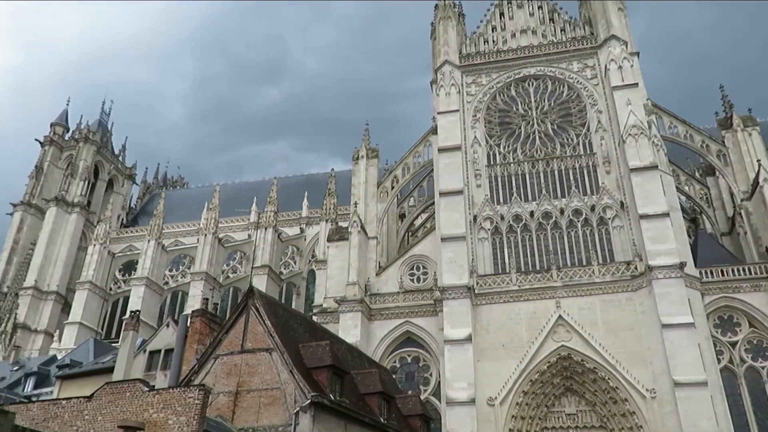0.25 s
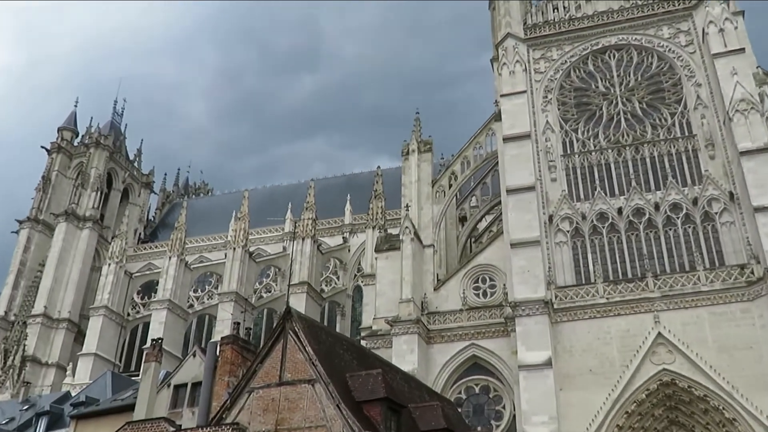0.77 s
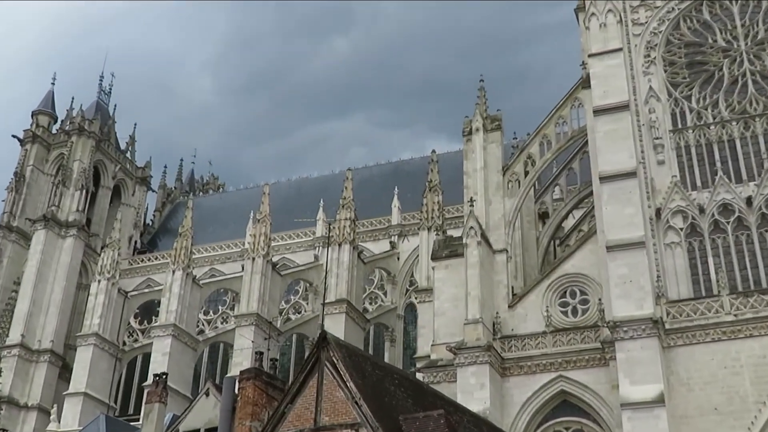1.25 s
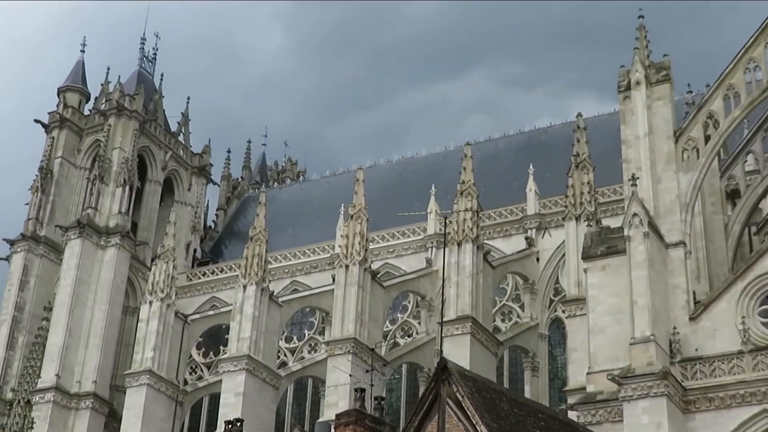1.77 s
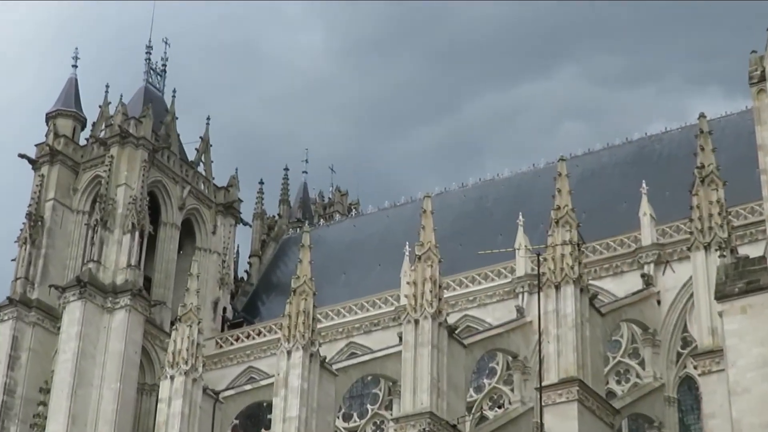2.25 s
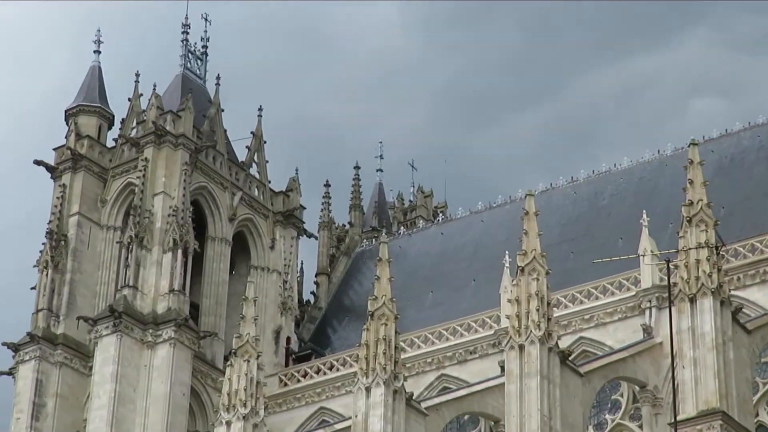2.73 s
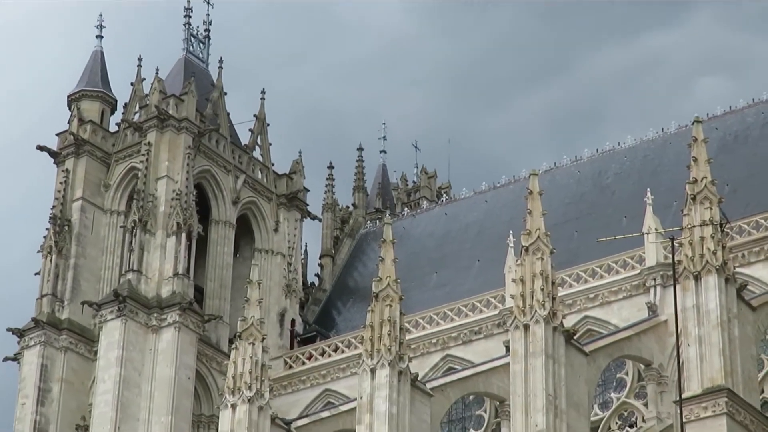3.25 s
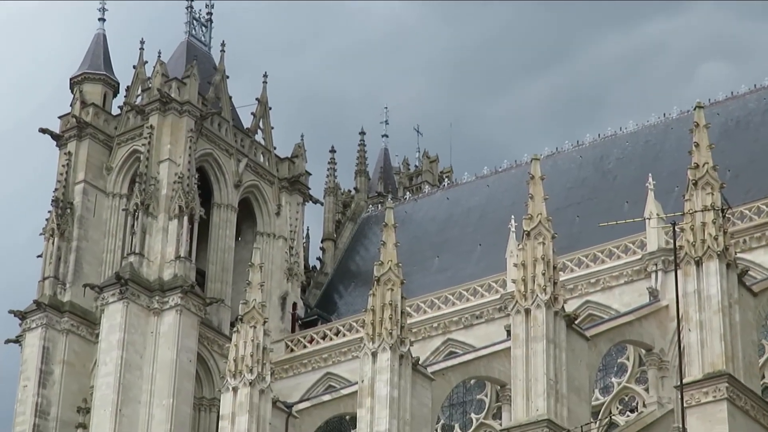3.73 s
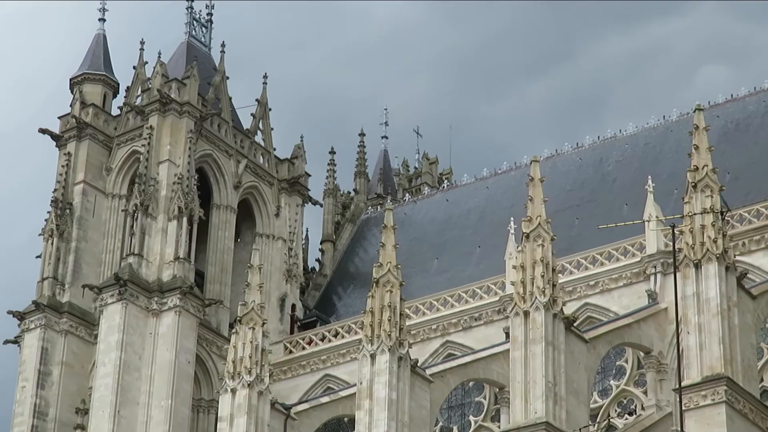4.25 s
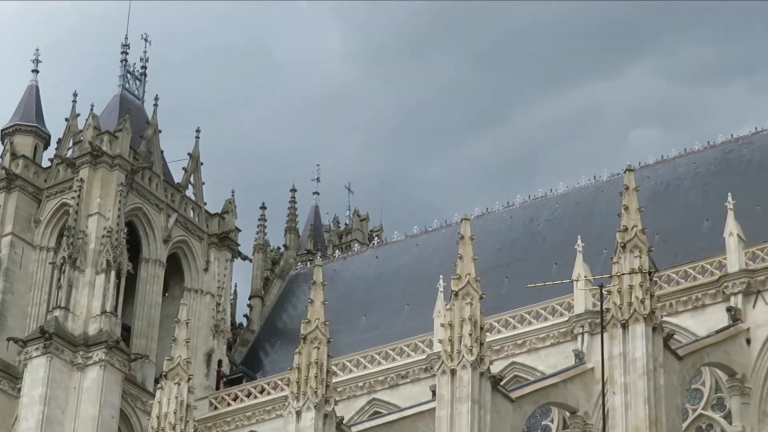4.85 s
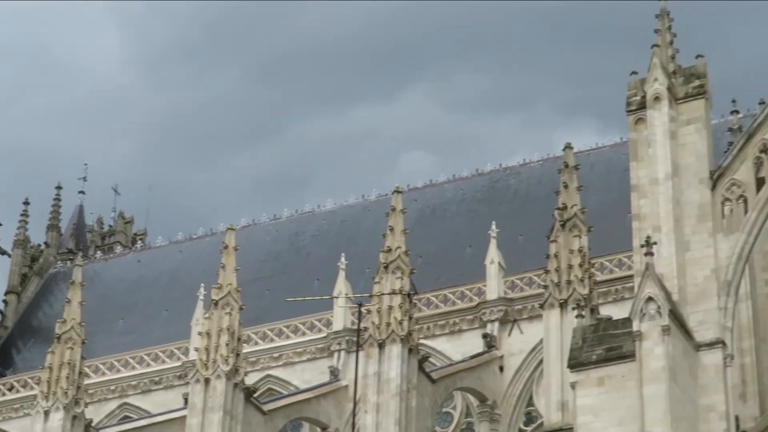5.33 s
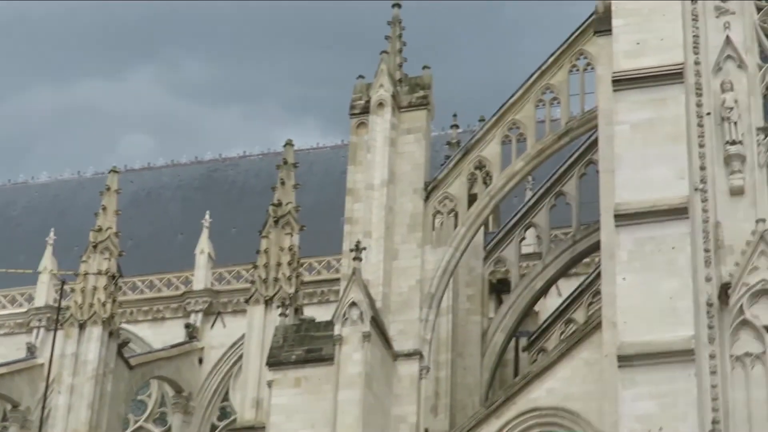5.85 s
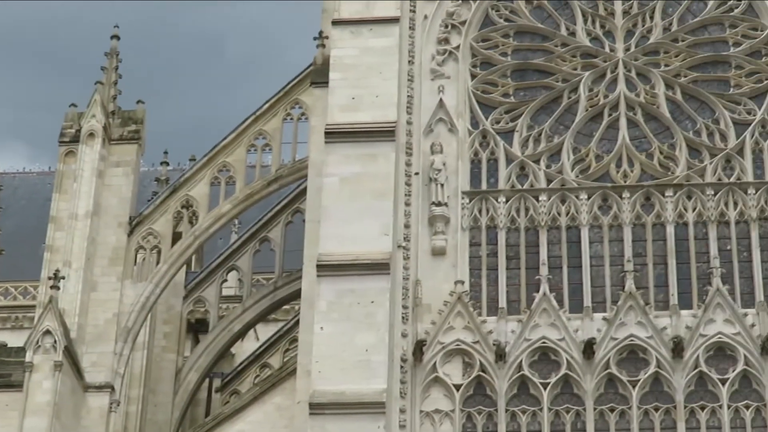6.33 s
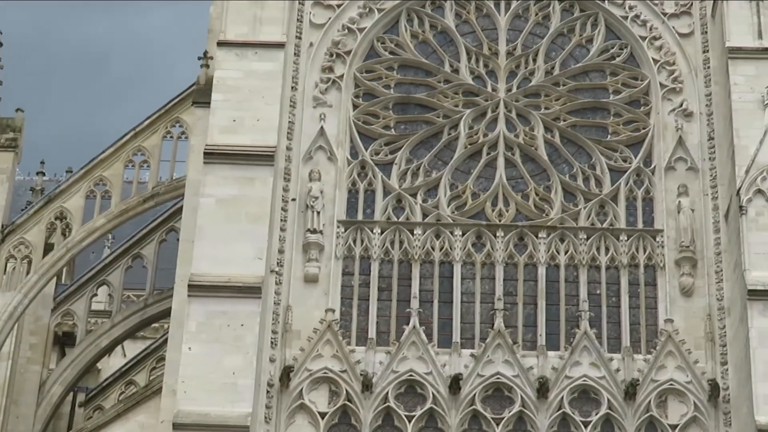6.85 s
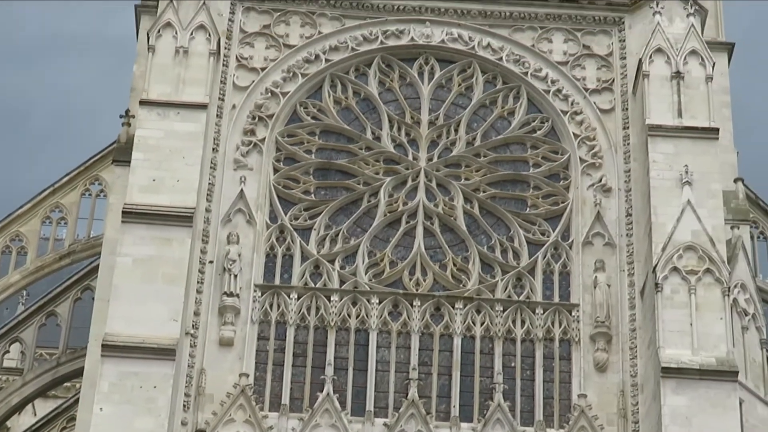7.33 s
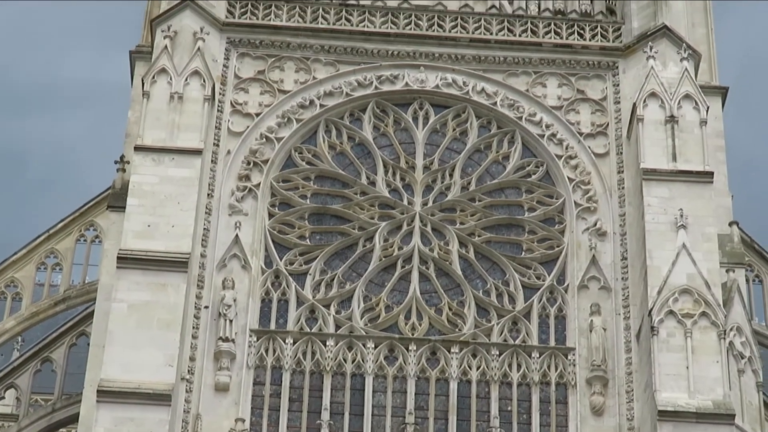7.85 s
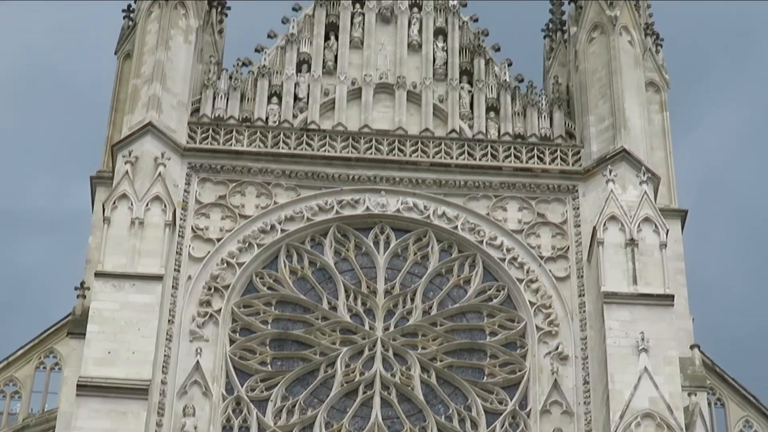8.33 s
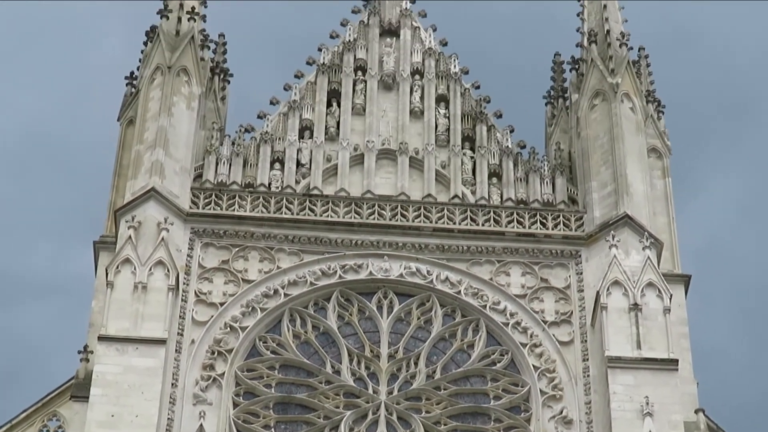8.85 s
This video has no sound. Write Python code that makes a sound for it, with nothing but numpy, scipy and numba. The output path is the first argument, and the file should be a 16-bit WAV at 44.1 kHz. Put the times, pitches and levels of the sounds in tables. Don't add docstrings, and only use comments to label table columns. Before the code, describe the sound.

A handheld stereo microphone catches street traffic beside big stone walls. Deep engine humming swells and sinks in slow pulses, revving and shifting, over dull rumble and airy haze. A cluster of finger ticks, cloth-like scrapes and tiny squeaks comes just past the middle. Soon after, tyres rush loudest, gear teeth whine and another car sweeps by. The engine shifts down in pitch, lingers, then fades among faint other engines.

```python
import sys
import numpy as np
from scipy import signal
from scipy.fft import rfft, irfft, next_fast_len
from scipy.io import wavfile
from scipy.ndimage import uniform_filter1d
from numba import njit

SR = 44100
rng = np.random.default_rng(int(sys.argv[2]) if len(sys.argv) > 2 else 0)


def digitize_waveform(pressure):
    field = np.atleast_2d(pressure).T
    bounded = np.clip(field, -1, 1)
    quanta = np.round(bounded * 32767).astype(np.int16)
    wavfile.write(sys.argv[1], SR, quanta)


def boost_factor(decibels):
    exponent = np.asarray(decibels, float) / 20
    return 10 ** exponent


N = 400869
T = np.arange(N) / SR

# t/s, tyre roar level/dB, brightness/dB
ROLLING = [(0, -44, -2.5), (.35, -46, 1.5), (.8, -44.5, 0), (1.7, -45, -0.5), (2.5, -42.5, 0.5),
           (3.3, -42.5, 0), (3.9, -43, 2), (4.5, -41.5, 3), (5.1, -39.5, 2.5), (5.5, -39, 2),
           (6.15, -34, -1), (6.35, -36, 2.5), (6.55, -32.5, -1), (7.05, -36.5, -.5), (7.6, -38, 1.5),
           (7.9, -35.5, -0.5), (8.4, -41, 2.5), (9.09, -43, -0.5)]


def curve(table, off_db=None):
    s, *columns = np.transpose(table)
    return [np.interp(T, s, c, off_db, off_db) for c in columns]


def unit(x):
    return x / np.sqrt(np.mean(x ** 2))


def walk(rate_hz):
    k = max(int(SR / rate_hz / 64), 2)
    steps = np.repeat(rng.standard_normal(N // 64 // k + 2), k)
    slewed = uniform_filter1d(uniform_filter1d(steps, k), k)
    return 1.3 * np.interp(T, np.arange(len(steps)) * 64 / SR, slewed)


def swell(start_s, length_s):
    gone = np.clip((T - start_s) / length_s, 0, 1)
    return gone, np.sin(np.pi * gone)


def tone(hz, db, wobble=.004, rate_hz=12):
    cycles = np.cumsum(hz * (1 + wobble * walk(rate_hz))) / SR
    return np.sqrt(2) * boost_factor(db) * np.sin(2 * np.pi * (cycles + rng.random()))


def band(x, hz, width_hz):
    edges = np.clip([hz - width_hz / 2, hz + width_hz / 2], 100, 20000)
    return signal.sosfilt(signal.butter(2, edges, "band", fs=SR, output="sos"), x)


def on_log(table, hz):
    f, db = np.transpose(table)
    return np.interp(np.log(np.maximum(hz, 1)), np.log(f), db, db[0] - 46.5, db[-1] - 43)


def wash(colour, flicker_db, tilt_db=0.):
    # f/Hz, level/dB
    scatter = [(27, -20), (45, -34), (70, -56), (200, -34), (400, -17.5), (1200, -15), (2500, -10),
               (5000, -2), (12000, 5)]
    size = next_fast_len(N)
    hz = np.arange(size // 2 + 1) * SR / size
    side_db = np.clip(on_log(scatter, np.clip(hz, 27, 11999)), -60, 6)
    gains = boost_factor(on_log(colour, hz)) * np.array([np.ones(len(hz)), boost_factor(side_db)])
    spectra = rfft(rng.standard_normal((2, size))) * gains
    spectra /= np.sqrt(np.mean(irfft(spectra[0], size) ** 2))
    octave = np.log2(np.maximum(hz, 1) / 1000)
    lowest = int(np.log2(colour[1][0] / 1000)) - 1
    highest = int(np.log2(colour[-2][0] / 1000)) + 1
    out = 0
    for centre in range(lowest, highest + 1):
        part = irfft(spectra * np.clip(1 - np.abs(octave - centre), 0, 1), size)[:, :N]
        out = out + part * boost_factor(flicker_db * walk(7) + tilt_db * np.clip(centre + .5, 0, 1))
    return out


def speed():
    # t/s, firing rate f/Hz
    revs = [(0, 49.5), (.9, 72.5), (1.45, 70), (1.8, 66.2), (2.25, 80), (2.6, 84), (2.9, 78.5), (3.2, 60.5),
            (3.47, 66.5), (3.92, 72), (4.2, 72), (4.45, 78), (4.78, 83.6), (4.95, 85), (5.55, 86.2),
            (5.8, 87.1), (6.74, 86.3), (6.97, 64.8), (7.7, 66.5), (8.2, 66), (8.35, 61.5), (9.09, 60)]
    return uniform_filter1d(np.interp(T, *np.transpose(revs)), SR // 10)


def beats(table, null_db):
    crest_db = 2.5
    s, db, share = np.transpose(table)
    crest = s[:-1] + np.clip(share[:-1], .1, .9) * np.diff(s)
    turns = np.sort(np.append(s, crest))
    swing = np.sin(np.pi / 2 * np.interp(T, turns, np.arange(len(turns)))) ** 2
    return crest_db + np.interp(T, crest, db[:-1]) + 10 * np.log10(swing + (1 - swing) * boost_factor(2 * null_db))


@njit
def walls(x, lags, gain, damp):
    line, soft, out = np.zeros((8, 8192)), np.zeros(8), np.zeros(len(x))
    for i in range(len(x)):
        total = 0.
        for k in range(8):
            soft[k] += (1 - damp) * (gain[k] * line[k, (i - lags[k]) & 8191] - soft[k])
            total += soft[k]
        out[i] = total
        for k in range(8):
            line[k, i & 8191] = x[i] + soft[k] - total / 4
    return out


def engine():
    # t/s, peak level/dB, share gone at the peak
    firing_beats = [(0.0, -42, 0.1), (0.06, -35.5, 0.2), (0.24, -34.5, 0.46), (0.52, -36.5, 0.47),
                    (0.84, -31, 0.21), (1.44, -32.5, 0.5), (1.75, -28.5, 0.78), (2.03, -30.5, 0.5),
                    (2.16, -24.0, 0.75), (2.5, -28, 0.65), (2.79, -26.5, 0.3), (2.97, -30.5, 0.48),
                    (3.33, -35, 0.57), (3.6, -28.5, 0.47), (4.09, -35.5, 0.51), (4.32, -27.5, 1),
                    (4.5, -21, 0.64), (5.2, -26, 0.52), (5.61, -21.5, 0.53), (5.95, -24, 0.39),
                    (6.3, -29.5, 0.4), (6.46, -19.5, 0.76), (6.7, -22, 0.49), (6.82, -25, .4),
                    (6.96, -25.5, 0.8), (7.34, -24, 0.23), (7.75, -33, 0.55), (7.94, -34.5, 0.53),
                    (8.24, -33, 0.73), (8.37, -48, 0.1), (9.09, -60, 0.48)]
    # t/s, peak level/dB, share gone at the peak
    octave_beats = [(0.0, -39, 0.1), (0.08, -37.5, 0.33), (0.35, -33, 0.78), (0.93, -36.5, 0.81),
                    (1.2, -38, 0.096), (1.49, -29.5, 0.81), (1.96, -33.5, 0.15), (2.43, -32.5, 0.3),
                    (2.7, -31, 0.66), (3.01, -37, 0.2), (3.18, -38.5, 0.88), (3.43, -32.5, 0.4),
                    (3.72, -31, 0.76), (4.09, -32, 0.34), (4.26, -33, 0.18), (4.48, -31, 0.72),
                    (4.75, -33, 0.53), (4.94, -35.5, 0.46), (5.17, -35, 0.24), (5.4, -36, 0.75),
                    (5.98, -39, 0.44), (6.18, -31.5, 0.53), (6.58, -32.5, 0.25), (6.88, -25.5, 0.52),
                    (7.09, -28, 0.3), (7.27, -38.5, 0.36), (7.47, -24, 0.34), (7.98, -31, 0.41),
                    (8.31, -53, 0.2), (9.09, -60, 0.58)]
    # multiple of the firing rate, level under load/dB
    half_orders = [
        (.5, -24),
        (1.5, -17),
    ]
    # t/s, length/s, order, level/dB
    pipe_orders = [
        (2.4, .5, 2.5, -38),
        (4.1, .5, 2.58, -37.5),
        (5.8, .9, 3, -46),
        (7.25, .9, 3, -38),
        (7.3, .9, 2.5, -48),
    ]
    t60_s, damp, echo_db, sidewall_db = 2.8, 0.31, -31.5, -37
    clutch_db_per_hz_s = .13

    hz = speed()
    first_db = beats(firing_beats, null_db=-10)
    second_db = beats(octave_beats, null_db=-10.5) - .8
    load_db = uniform_filter1d(np.maximum(first_db, second_db), SR // 2)
    clutch_db = clutch_db_per_hz_s * np.minimum(np.gradient(hz) * SR + 30, 0)
    direct = tone(hz, first_db, wobble=.002) + tone(2 * hz, second_db + clutch_db, wobble=.002)
    for k, db in half_orders:
        direct += tone(k * hz, load_db + db + 2.9 * walk(5.8), wobble=0.01536)
    for s, length_s, k, db in pipe_orders:
        direct += tone(k * hz, db + 2.0 * walk(8), wobble=.008) * swell(s, length_s)[1]
    lags = rng.integers(1500, 7000, 8)
    echo = walls(direct, lags, boost_factor(-60 * lags / SR / t60_s), damp)
    return np.array([direct + boost_factor(echo_db) * echo, boost_factor(sidewall_db) * np.roll(direct, 900)])


def whine():
    # t/s, f/Hz
    meshing = [(4.1, 1380), (4.45, 1430), (4.8, 1560), (5.1, 1578), (5.3, 1545), (5.6, 1570), (5.9, 1602),
               (6.15, 1585), (6.45, 1602), (6.62, 1540), (6.9, 1215), (9.09, 1200)]
    # t/s, length/s, level/dB
    dashes = [(4.28, .18, -44), (4.77, .13, -45), (5.01, .18, -39.5), (5.43, .07, -39), (5.6, .13, -44),
              (5.75, .09, -45), (5.87, .1, -40), (5.96, .1, -40), (6.11, .08, -37), (6.2, .09, -42),
              (6.3, .09, -39), (6.4, .06, -32), (6.48, .05, -36.5), (6.54, .07, -38), (7.4, .2, -52),
              (7.8, .15, -48), (8.17, .2, -46), (8.6, .1, -48), (8.95, .14, -48)]
    from_s, under_roar_db = 4.1, -11.5
    shift_start_s, shift_end_s = 6.63, 6.95
    loaded = (T > from_s) * ((T < shift_start_s) | (T > shift_end_s))
    gain = boost_factor(curve(ROLLING)[0] + under_roar_db) * loaded
    for s, length_s, db in dashes:
        gain = np.maximum(gain, boost_factor(db) * np.sqrt(np.abs(swell(s, length_s)[1])))
    return gain * tone(curve(meshing)[0], 1.4 * walk(45), wobble=.009, rate_hz=55)


def car():
    # t/s, f/Hz, tone level/dB, octave level/dB
    passing = [
        (6.1, 164, -46, -55),
        (6.3, 158.1, -41, -52),
        (6.37, 150.4, -33, -44),
        (6.48, 142, -22, -28.5),
        (6.58, 133.4, -26, -29),
        (6.68, 126.6, -38, -39),
        (6.78, 121, -51, -46),
    ]
    hz = curve(passing)[0]
    first_db, second_db = curve(passing, off_db=-120)[1:]
    return tone(hz, first_db, wobble=0.0069) + tone(2 * hz, second_db - 3.0, wobble=0.013)


def handling():
    # t/s, peak level/dB, side minus mid/dB, f/Hz
    ticks = [(1.203, -41, 14, 12500), (2.226, -45, 1, 6480), (2.225, -56, 17, 11100),
             (2.321, -62, 3, 11000), (2.455, -57, 2, 12000), (2.6, -52, 2, 11500), (5.056, -40, -3, 11000),
             (5.061, -32, 0, 9500), (5.061, -35, -3, 5500), (5.07, -37, -2, 9000), (5.081, -38, -3, 8000),
             (5.092, -39, -4, 7000), (5.105, -41, -3, 6000), (5.112, -40, -3, 2998),
             (5.243, -38, -1, 12500), (5.261, -40, -4, 8500), (5.286, -35, -8, 7500), (5.3, -30, -5, 9500),
             (5.311, -34, -5, 10000), (5.319, -36, -4, 10500), (5.327, -33, -2, 12000),
             (5.334, -42, -5, 6000), (5.34, -34, -4, 10500), (5.345, -31, -2, 12500),
             (5.354, -39, -3, 10000), (5.362, -32, -2, 13000), (5.377, -37, -2, 12500),
             (5.391, -37, 1, 13300), (5.407, -36, 0, 13300), (5.362, -41, -8, 3600), (5.385, -36, -8, 2210),
             (5.351, -41, -8, 4600), (5.372, -33, -8, 3200), (5.394, -36, -8, 4800),
             (5.409, -27.5, -9, 3300), (5.56, -56, 5, 13500), (5.952, -46, 14, 11980),
             (6.12, -57, 6, 11500), (6.18, -53, 5, 12000), (7.477, -43, 8, 5512), (7.528, -48, 10, 13800),
             (7.54, -44, 14, 11500), (7.54, -38, 4, 5000), (8.227, -42, -1, 7000), (8.242, -35, 3, 10500)]
    # t/s, length/s, level/dB, f/Hz, width/Hz
    rustles = [(.1, .22, -64, 6500, 7000), (1.74, .07, -73, 13300, 1510), (1.85, 0.059, -71, 13150, 2500),
               (2.196, .04, -47, 2370, 400), (2.55, 0.025, -49.5, 3400, 450), (4.7, .09, -58, 12700, 1788),
               (4.95, 0.055, -58, 11300, 2400), (5.028, 0.11, -53.5, 9302, 7000),
               (5.11, 0.12, -61, 11900, 2200), (5.21, 0.1, -61, 8500, 3000), (5.044, 0.07, -55, 5500, 3000),
               (5.297, 0.099, -52, 5400, 3000), (5.3, .13, -56, 13500, 1500),
               (5.355, 0.027, -45, 3250, 900), (5.396, 0.018, -42, 3240, 700),
               (5.214, 0.089, -57, 12800, 3400), (5.295, .13, -49, 11900, 5500),
               (5.313, 0.092, -43, 2800, 2480), (7.51, 0.055, -62, 13510, 2000),
               (8.217, 0.05, -59, 10400, 4540)]
    # t/s, length/s, level/dB, f/Hz
    squeaks = [
        (5.29, .06, -43, 2120),
        (5.368, .026, -36, 1890),
    ]
    out = np.zeros((2, N))
    for s, db, side_db, hz in ticks:
        t = T[:400]
        burst = rng.standard_normal((2, len(t))) * np.exp(-t * hz / 8.1)
        tick = band(burst, hz, 0.85 * hz * min(hz / 7000, 1))
        peak = np.abs(tick).max(axis=1)[:, None]
        mid, side = tick / peak * boost_factor(db + np.array([[0], [side_db]]))
        i = int(s * SR)
        out[:, i:i + len(t)] += np.array([mid + side, mid - side])
    for s, length_s, db, hz, width_hz in rustles:
        i, n = int(s * SR), int(length_s * SR)
        grain = boost_factor(2.2 * np.repeat(rng.standard_normal(200), 130))[:n]
        mid, side = band(rng.standard_normal((2, 26000))[:, :n] * grain, hz, width_hz)
        side = 0.8 * min(hz / 13000, 1) ** 2 * side
        out[:, i:i + n] += unit(mid + side * np.array([[1], [-1]])) * boost_factor(db) * np.hanning(n) ** 0.13
    for s, length_s, db, hz in squeaks:
        out += tone(hz, db, wobble=.03, rate_hz=150) * swell(s, length_s)[1]
    return out


def traffic():
    # f/Hz, level/dB
    rumble_colour = [(13, -34.5), (22, -19.5), (48, -3), (66, -3), (105, -5.5), (160, -5), (290, -10.5),
                     (357, -14), (480, -17), (620, -43), (1060, -120)]
    tyre_colour = [(260, -21), (440, -3), (617, 0.5), (865, -3.5), (1190, -3.5), (1340, -5.5), (1550, -7),
                   (1690, -7), (2390, -9), (2650, -18), (3440, -56), (5830, -120)]
    haze_colour = [(1470, -22.5), (2500, -11), (2810, -3), (6800, -20), (10600, -26), (11500, -25),
                   (12500, -24.5), (15500, -30)]
    fan_colour = [(1470, -36.5), (2500, -6), (2750, -5.5), (4950, -16), (7930, -29), (11700, -38),
                  (12500, -38.5), (15500, -43)]
    far_db = -46.5
    rumble_db, rumble_follows, rumble_start_db, rumble_start_s = -39, 0.63, -0.5, 0.39
    dip_hz, dip_width_hz, dip_share, dip_gone_db = 670, 370, 0.49, 4.5
    haze_db, haze_start_db, haze_fade_s, haze_follows = -59.5, 3.5, .2, 0.48
    fan_on_s, fan_db, fan_follows, fan_bright = 2.83, -53, 0.69, 0.99
    opening_db, opening_s = -56.5, 0.25

    roar_db, upper_db = curve(ROLLING)
    near_db = uniform_filter1d(roar_db - far_db, SR // 2)
    start_db = rumble_start_db * np.exp(-T / rumble_start_s)
    out = wash(rumble_colour, flicker_db=1.07) * boost_factor(rumble_db + rumble_follows * near_db + 3.5 + start_db)

    tyres = wash(tyre_colour, flicker_db=0.0, tilt_db=upper_db - 0.95) * boost_factor(roar_db + 4.0)
    dip = dip_share * np.clip(1 - near_db / dip_gone_db, 0, 1)
    out += tyres - dip * band(tyres, dip_hz, dip_width_hz)

    start_db = haze_start_db * np.exp(-T / haze_fade_s)
    follow_db = haze_follows * np.interp(T, [0, fan_on_s], [0, 1]) * np.minimum(near_db, 3)
    out += wash(haze_colour, flicker_db=0.75) * boost_factor(haze_db + start_db + follow_db + 1.5)

    running_db = fan_db + fan_follows * near_db + fan_bright * uniform_filter1d(upper_db, SR // 2)
    opening = boost_factor(opening_db) * np.exp(-T / opening_s)
    return out + wash(fan_colour, flicker_db=0.2) * np.where(T > fan_on_s, boost_factor(running_db + 0.4), opening)


def others():
    # t/s, length/s, start f/Hz, end f/Hz, level/dB
    glides = [(0.046, 0.555, 74, 96.4, -37), (1.003, 2.31, 50, 56, -39.5), (4, 1.1, 67, 51, -39),
              (3.7, 0.93, 129, 110, -45), (6.8, 0.27, 85, 78, -25), (6.3, .27, 270, 232, -31),
              (6.33, .2, 153, 143, -30), (4.5, .5, 153, 158, -35), (6.05, 0.34, 140, 156, -41),
              (5.88, .14, 292, 260, -36.5), (7.1, 0.25, 48, 74, -41), (5.9, 0.44, 86, 92, -31),
              (7.7, 0.37, 98, 103, -38), (8.199, 0.72, 121.2, 118.7, -42.5),
              (0.746, 0.32, 443, 352.6, -45.5), (8.25, 0.52, 56, 59.6, -36), (0.262, 0.35, 282, 310, -43.5),
              (1.24, 0.57, 282, 278, -46), (1.8, 0.295, 230, 220, -38), (2.9, 0.46, 190, 165, -40),
              (5.95, 0.72, 735, 790, -44.5), (8.25, .25, 262, 265, -45), (8.45, 0.41, 242, 220, -40.5),
              (8.4, 0.47, 120, 98, -45), (7.3, 0.44, 240, 238, -40)]
    out = 0
    for s, length_s, from_hz, to_hz, db in glides:
        gone, shape = swell(s, length_s)
        hz = from_hz + (to_hz - from_hz) * gone
        out = out + tone(hz, db, wobble=0.01012) * np.sqrt(np.abs(shape))
    return out


def patchwork(mid, side):
    # t/s, patchiness/dB, share of starved frames, treble floor under 3-6 kHz/dB
    states = [(0, 2.2, 0, -14), (.3, 2.6, .35, -24.5), (2.3, 2.8, .6, -23), (2.8, 2.8, .65, -22.5),
              (2.9, 1.8, .15, -22.5), (3.9, 1.8, .1, -21), (4.5, 1.6, .3, -19), (5.8, 1.5, .55, -21),
              (6.1, 1.5, .5, -31), (6.55, 1.5, .5, -31), (6.75, 1.5, .5, -25), (7.3, 1.5, .5, -25),
              (8.1, 1.6, .2, -25), (9.09, 1.8, .1, -22)]
    favoured_hz = (10800, 12400, 13500)
    mask_hz, top_hz, sudden_top_hz = 8100, 14600, 15600
    stingy_hz, stingy_db, stingier_hz, stingier_db, favoured_db = 11000, 4, 13700, 4, 3
    thin_db, thin_share = 7, .3
    sudden_db = 5

    hz, s, cells = signal.stft(np.array([mid, side]), SR, nperseg=1024, noverlap=768)
    state_s, *columns = np.transpose(states)
    patchy_db, starved, floor_db = (np.interp(s, state_s, c) for c in columns)
    line_hz = hz[:, None]
    field = uniform_filter1d(rng.standard_normal(cells.shape), 3, axis=1)
    field = uniform_filter1d(field, 6, axis=2) * np.sqrt(18)
    cells = cells * boost_factor(patchy_db * field * np.clip(line_hz / 1200, 0, 1.3) - .115 * patchy_db ** 2)

    frame, strip = np.arange(len(s)) // 4, np.arange(len(hz)) // 9
    chance = rng.standard_normal((strip[-1] + 1, frame[-1] + 1))[strip][:, frame]
    power = uniform_filter1d(uniform_filter1d(np.abs(cells[0]) ** 2, 16, axis=0), 4, axis=1)
    masker = uniform_filter1d(power[(hz > 2800) & (hz < 6000)].mean(axis=0), 40)
    bar_db = stingy_db * (hz > stingy_hz) + stingier_db * (hz > stingier_hz)
    bar_db = bar_db - favoured_db * (np.abs(line_hz - favoured_hz).min(axis=1) < 200)
    bar = masker * boost_factor(2 * (floor_db + bar_db[:, None] + 3.4 * chance))
    kept = rng.random((len(hz), frame[-1] + 1))[np.arange(len(hz)) // 2][:, frame] < thin_share
    masked = (power < bar) | ((power < bar * boost_factor(2 * thin_db)) & ~kept)

    top = (np.abs(cells[1][hz > mask_hz]) ** 2).mean(axis=0)
    jump = (top > signal.medfilt(top, 41) * boost_factor(2 * sudden_db)) & (top > 2 * uniform_filter1d(top, 13))
    sudden = jump & (line_hz < sudden_top_hz)
    cells[0] *= (~(masked & (line_hz > mask_hz)) & (line_hz < top_hz)) | sudden

    short, edge = rng.random((2, frame[-1] + 1))[:, frame // 2]
    edge_hz = np.where(short < starved, 7000 + 6000 * edge, top_hz - 500 * starved + 1400 * (edge - .2))
    ragged = chance > -(edge_hz - line_hz) / (500 + 3500 * starved) - .1
    below_edge = (line_hz < edge_hz) & ragged
    lucky = (chance > .5) & (line_hz < top_hz - 700)
    strong = (power > masker * boost_factor(-30)) & (line_hz < top_hz)
    cells[1] *= below_edge | sudden | lucky | strong
    return signal.istft(cells, SR, nperseg=1024, noverlap=768)[1][:, :N]


def scene():
    # t/s, lead/samples
    lead = [
        (0, 2.6),
        (2, 2.1),
        (4, 1.95),
        (6, 0.34),
        (7, 0.091),
        (9.09, 0.17),
    ]
    left_share = .008
    mid, side = traffic() + engine()
    mid = mid + whine() + car() + others()
    side = side + left_share * mid + curve(lead)[0] / 2 * np.gradient(mid)
    return np.array([mid + side, mid - side]) + handling()


def roll_off(x):
    return signal.sosfilt(signal.butter(12, 15600, fs=SR, output="sos"), x)


def record(dry):
    # f/Hz, level/dB
    port_colour = [(4120, -19), (7000, 6.5), (13100, -2), (14100, 1), (15400, -5)]
    port_db = -74
    hiss = wash(port_colour, flicker_db=1.5)[0] * boost_factor(port_db)
    mid, side = patchwork((dry[0] + dry[1]) / 2, (dry[0] - dry[1]) / 2 + hiss)
    return roll_off(np.array([mid + side, mid - side]))


dry = scene()
out = record(dry)
digitize_waveform(out)
```